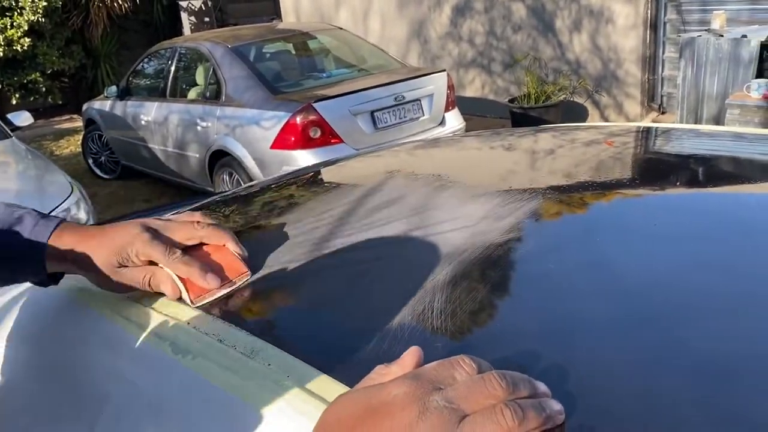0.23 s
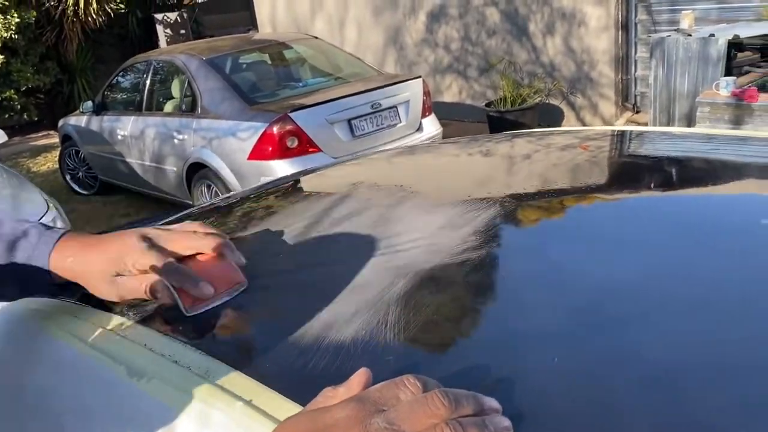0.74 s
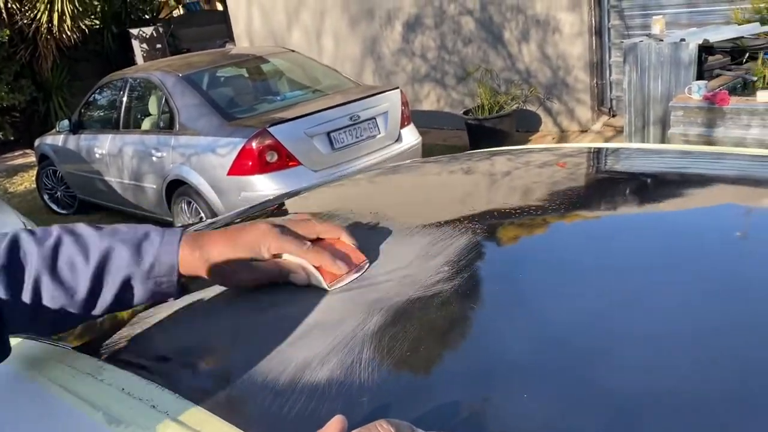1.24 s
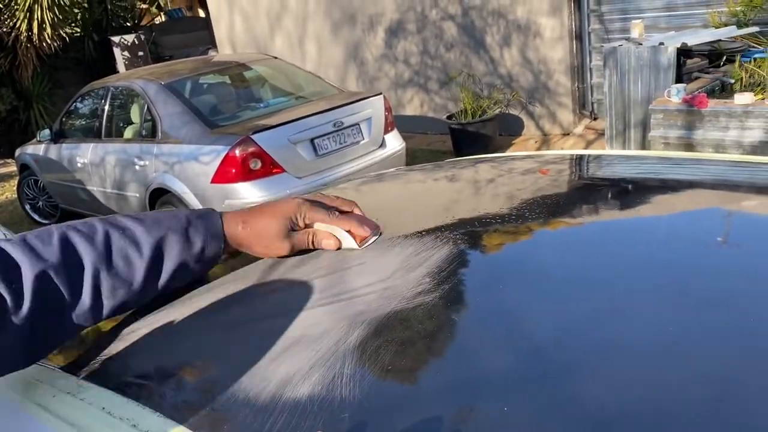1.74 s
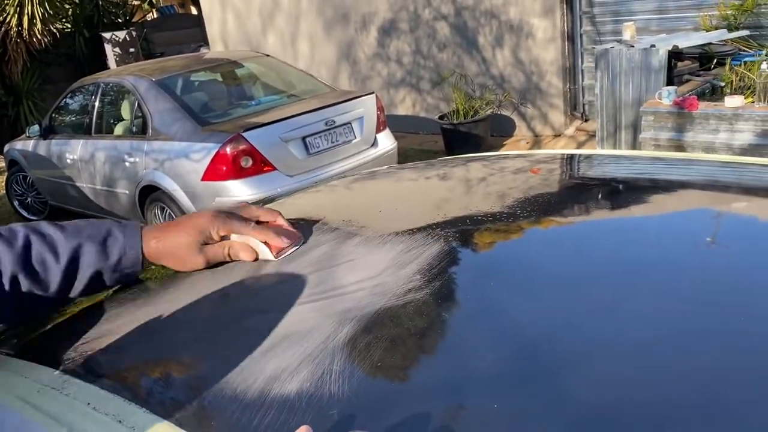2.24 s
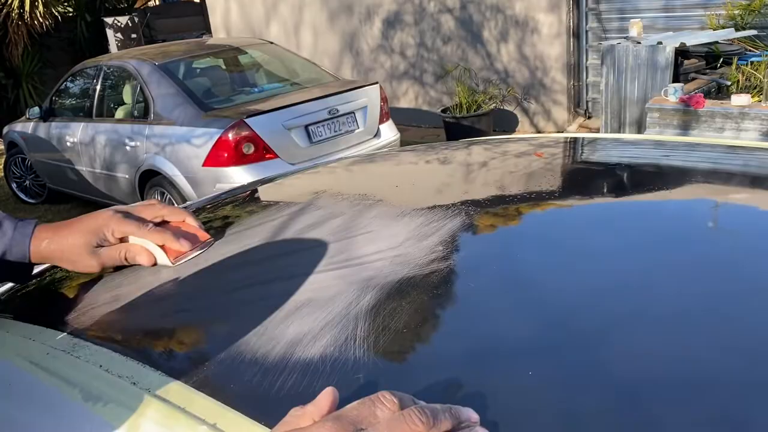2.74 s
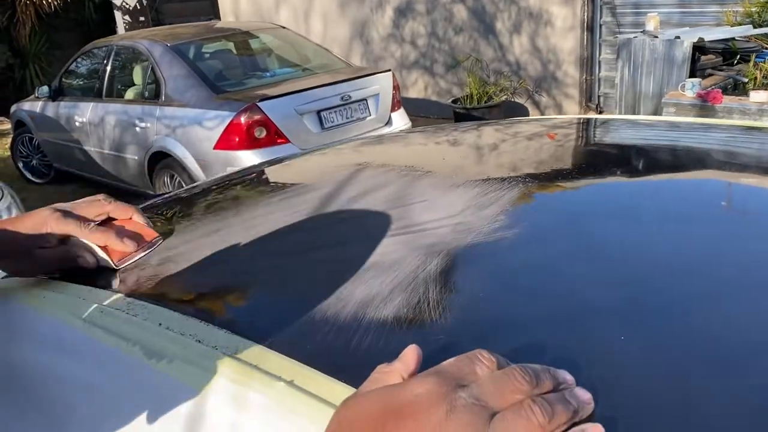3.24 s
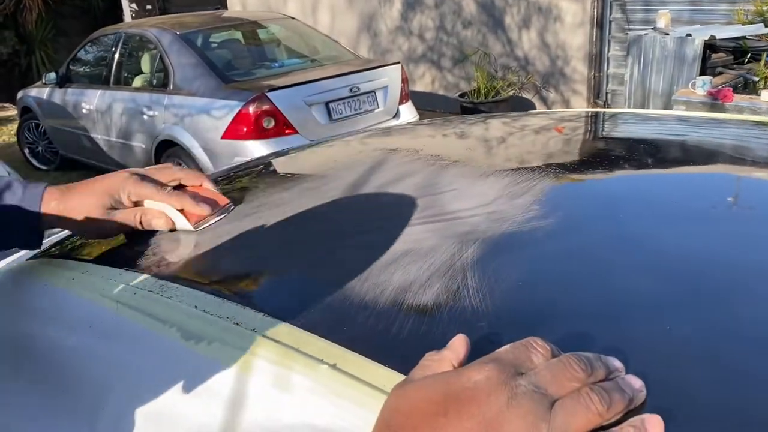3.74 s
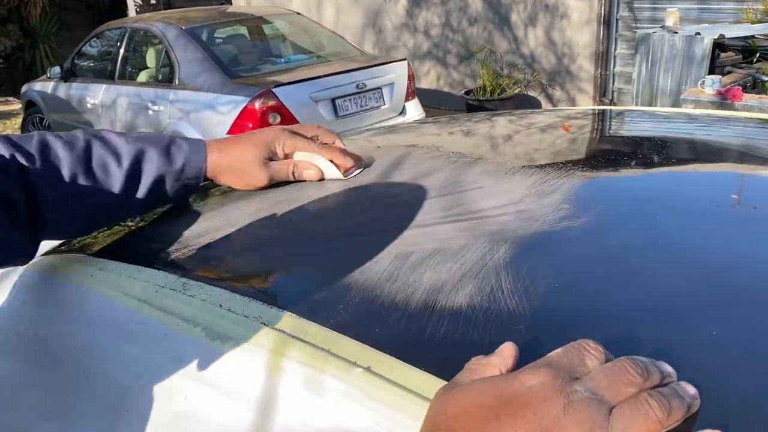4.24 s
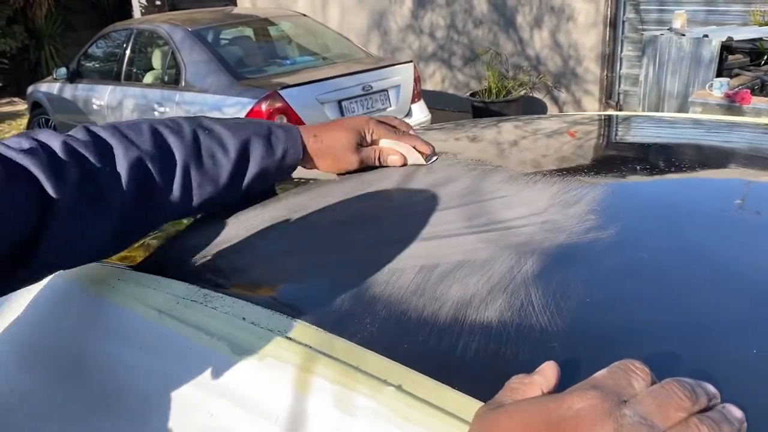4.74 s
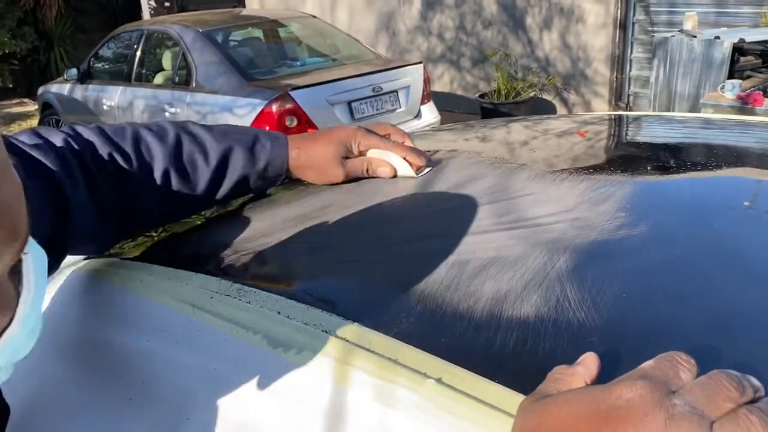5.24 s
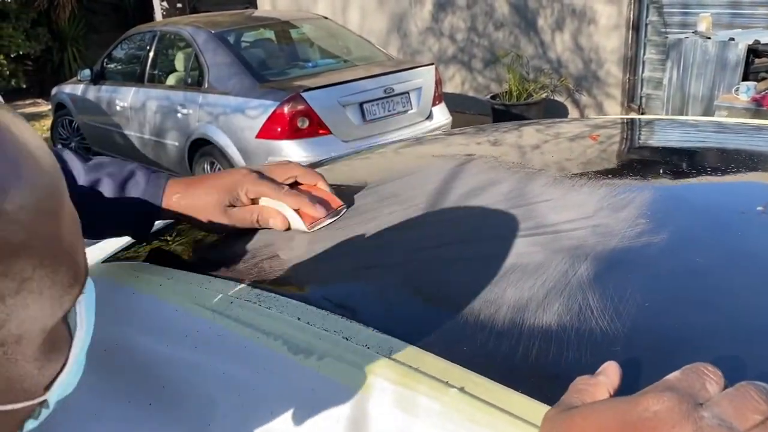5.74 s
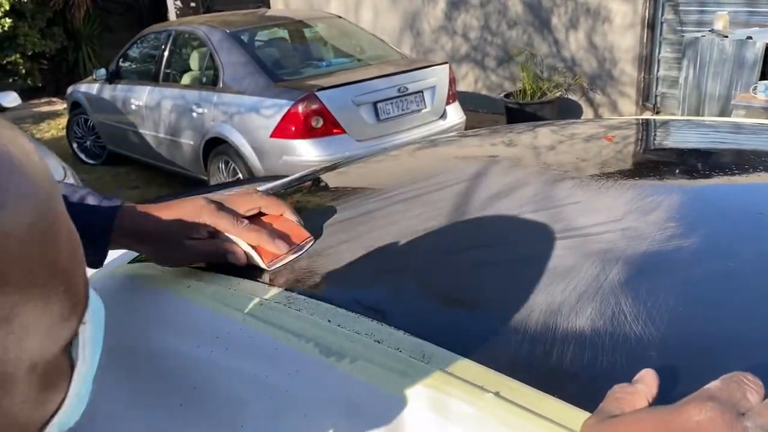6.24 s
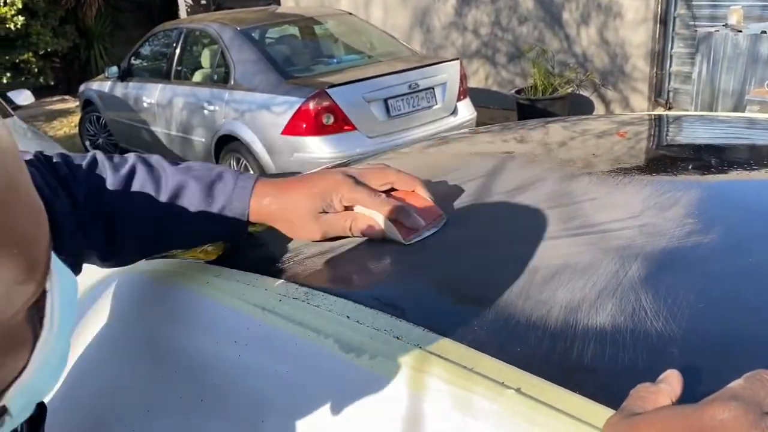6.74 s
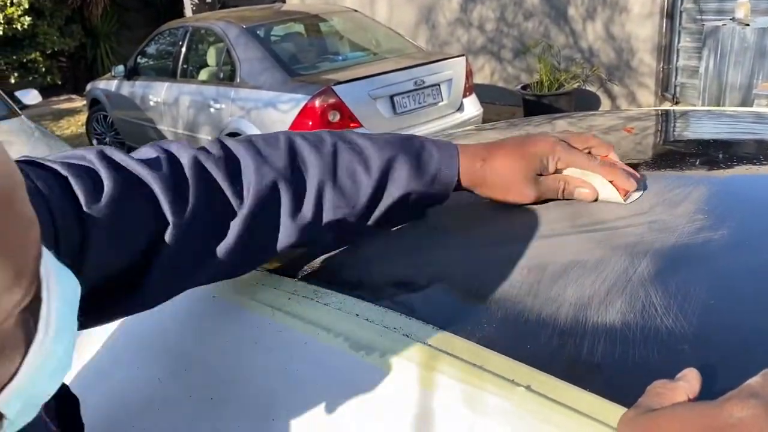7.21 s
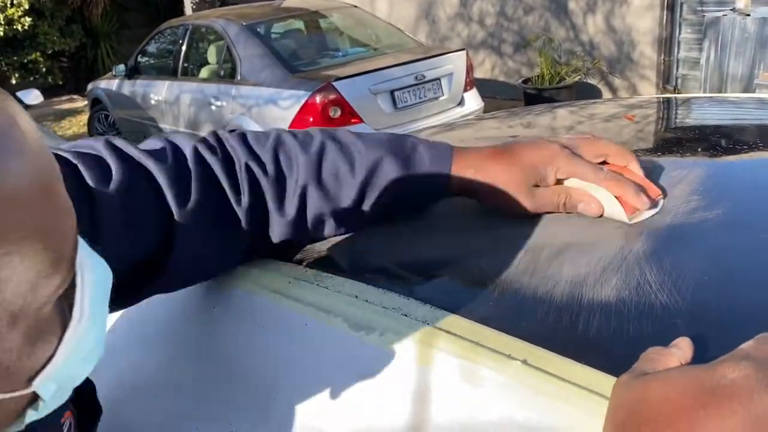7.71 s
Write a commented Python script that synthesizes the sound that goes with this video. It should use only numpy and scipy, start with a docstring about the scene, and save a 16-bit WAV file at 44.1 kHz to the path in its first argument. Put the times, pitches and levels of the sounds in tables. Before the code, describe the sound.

Sandpaper on a hand block rasps rapidly back and forth over a painted car roof, with soft metal thuds and faint outdoor rumble.

```python
"""Quick rasping strokes run throughout: a car roof is sanded by hand in an open yard, about three a second.
Noisy grit follows the speed of the block as rasp, hiss and singing steel, and drops away at every turn.
Now and then the paper judders; filtered blows make the soft thuds of the skin and the knocks on the paint.
A short echo and a low outdoor rumble with gusts and distant traffic lie beneath.
Two closely spaced microphone ports listen from arm's length, differing in phase and level over frequency."""
import sys
import numpy as np
from scipy import signal
from scipy.fft import rfft, irfft, next_fast_len
from scipy.io import wavfile
from scipy.ndimage import uniform_filter1d

SR = 44100
rng = np.random.default_rng(int(sys.argv[2]) if len(sys.argv) > 2 else 0)


def store_wav(level_fs):
    """Save 16-bit WAV to argv[1]."""
    pcm = np.round(np.clip(np.atleast_2d(level_fs), -1, 1) * 32767)
    wavfile.write(sys.argv[1], SR, pcm.T.astype(np.int16))


N = 351477
TIME = np.arange(N) / SR
SIZE = next_fast_len(N, True)   # padded length for the Fourier transforms
HZ = np.maximum(np.arange(SIZE // 2 + 1) * SR / SIZE, 1)


def sanding():
    """Block speed and hand pressure drive rasp, hiss and the ring of the steel, with judders on top."""
    speed, progress = arm(creep=0.039, stick_s=0.0069, stuck_db=-9.5, bite=0.08, bite_s=0.015)
    reach = (1 + np.cos(np.pi * progress)) / 2   # 0 near, 1 far
    rasp_db, hiss_db, panel_db = hand(speed, progress, reach)
    # the paper sticks and slips, and the hand's pressure wavers
    grip = from_db(rasp_db + 0.5 * drift(rate=360) + 0.58 * drift(rate=23))
    ring_gain = from_db(panel_db + 0.83 * drift(rate=37))
    rub = grip * (rasp(speed) + from_db(hiss_db) * hiss(speed) + ring_gain * panel(speed))
    return mottle(rub + judder(speed, reach), broad_db=1.0, fine_db=2.5)


# Each stroke starts at a turn, first at the far end, then near and far in turn:
# (start_s, light_touch_rasp_db, lean_swell_db, lean_place 0 near to 1 far,
#  lean_width as a share of the path, panel_over_rasp_db before reach and leaning)
STROKES = [(-0.123, -45.5, 12.5, 0.54, 0.46, 5), (0.207, -44, 12.7, 0.66, 0.52, 2),
           (0.512, -43, 11, 0.63, 0.38, -0.8), (0.834, -40, 8.5, 0.58, 0.33, -3.5),
           (1.128, -43.5, 10, 0.64, 0.46, -2.1), (1.436, -40.5, 5.5, 0.5, 0.24, -5.5),
           (1.731, -45, 9.5, 0.62, 0.31, -3.5), (2.034, -42.5, 5, 0.61, 0.23, -8.5),
           (2.318, -44, 6, 0.63, 0.17, -8.5), (2.61, -44.5, 7, 0.64, 0.15, -9),
           (2.908, -44.5, 6, 0.66, 0.17, -10.5), (3.218, -43.5, 4, 0.6, 0.1, -8.5),
           (3.511, -44.5, 5.5, 0.6, 0.13, -14), (3.822, -44, 0.8, 0.61, 0.08, -9.5),
           (4.119, -44.5, 3.5, 0.6, 0.08, -13), (4.425, -45, 1, 0.61, 0.08, -10.4),
           (4.72, -45.0, 2.5, 0.64, 0.06, -11), (5.029, -43.5, 2, 0.62, 0.094, -8),
           (5.33, -44.6, 3, 0.65, 0.11, -9), (5.633, -43.5, 6.3, 0.64, 0.21, -1),
           (5.939, -44.5, 6, 0.6, 0.23, -3), (6.25, -42, 8.3, 0.65, 0.33, 2),
           (6.555, -46.5, 10, 0.55, 0.35, 4), (6.86, -43, 10.5, 0.64, 0.41, 4.5),
           (7.165, -47, 11.5, 0.62, 0.45, 5), (7.472, -43, 11.5, 0.69, 0.46, 5.6),
           (7.787, -44.5, 10, 0.61, 0.41, 4.5), (8.07, -44.0, 10.1, 0.6, 0.38, 5.0)]
NEAR_REST_S, FAR_REST_S = 0.012, 0.02   # the block rests at each end of its path


def arm(creep, stick_s, stuck_db, bite, bite_s):
    """The arm swings like a pendulum and rests at each turn: block speed (about 0-1) and strokes completed."""
    start_s = np.array(STROKES)[:, 0]
    count = np.arange(len(start_s))
    rest_s = np.where(count % 2, NEAR_REST_S, FAR_REST_S)
    stops = np.column_stack([start_s - rest_s / 2, start_s + rest_s / 2]).ravel()
    progress = np.interp(TIME, stops, np.repeat(count, 2))
    # the paper holds fast while the hand takes up the slack, then breaks away with a jerk
    latest = np.searchsorted(start_s - rest_s / 2, TIME) - 1
    sliding_s = TIME - (start_s + rest_s / 2 + stick_s)[latest]
    swing = np.abs(np.sin(np.pi * progress)) + creep
    jerk = bite * np.exp(-np.abs(sliding_s) / bite_s)
    speed = np.where(sliding_s > 0, swing + jerk, swing * from_db(stuck_db))
    return uniform_filter1d(speed, size=90), progress


# Fine hiss over the rasp, before the hand's changes: (time_s, level_db)
HISS_LEVEL = [(0, 3.5), (.9, -0.5), (3.3, 2.5), (7.97, 3)]
# towards the far end the rasp grows and the steel rings more freely; leaning damps the ring (dB per dB)
FAR_RASP_DB, FAR_RING_DB, LEAN_DAMPING = 2, 9, 0.99
PULL_HISS_DB, LEAN_HISS = 1.6, 0.27   # extra hiss when pulling back, and per dB of leaning
# a lightly held block keeps hissing when slow: (dB at rest, dB less for each dB of swell)
SLOW_HISS_DB, SLOW_HISS_PER_DB = 6.6, 0.68


def hand(speed, progress, reach):
    """The hand leans in once a stroke: level of the rasp, and of hiss and ring over it, in dB."""
    stroke = progress.astype(int)
    _, touch_db, swell_db, lean_place, lean_width, ring_db = np.array(STROKES)[stroke].T
    place = np.abs(progress % 2 - 1)   # 0 near, 1 far
    pulling = stroke % 2 == 0
    lean_db = swell_db * np.exp(-((place - lean_place) / lean_width) ** 2)
    base_hiss_db = np.interp(TIME, *np.transpose(HISS_LEVEL))
    slow_db = (SLOW_HISS_DB - SLOW_HISS_PER_DB * swell_db) * (1 - speed ** 2)
    rasp_db = touch_db + lean_db + FAR_RASP_DB * reach
    hiss_db = base_hiss_db + PULL_HISS_DB * pulling + LEAN_HISS * lean_db + slow_db
    panel_db = ring_db + FAR_RING_DB * reach ** 2 - LEAN_DAMPING * lean_db
    return rasp_db, hiss_db, panel_db


# Spectrum of the coarse rasp: (frequency_hz, relative_db)
RASP = [(200, -31), (600, -21.5), (1000, -18.5), (1600, -24), (2600, -12), (3400, -5), (4300, -4),
        (4900, -0.6), (5600, -1.1), (6500, -0.5), (7800, -1.5), (9500, -2.5), (16000, -21)]


def rasp(speed):
    """Coarse scraping of the grit, louder as the block moves faster."""
    grains = grit(speed, per_s=2000, size_db=2.0, snag_share=0.11)
    return colour(grains, RASP) * speed ** 0.6


# Spectrum of the fine hiss: (frequency_hz, relative_db)
HISS = [(4000, -41), (6800, -10.5), (8200, -0.5), (9400, 0.5), (11000, 0), (13000, -1), (14800, -3.5),
        (16000, -9)]


def hiss(speed):
    """Fine treble of the grit, which follows speed more closely than the rasp."""
    grains = grit(speed, per_s=4000, size_db=1.5, snag_share=0.14)
    return colour(grains, HISS) * speed ** 0.74


# Spectrum of the singing steel: (frequency_hz, relative_db)
PANEL = [(400, -19.5), (800, -12), (1050, -14.5), (1300, -5.5), (1650, -4), (1950, -0.9), (2300, -2.4),
         (2800, -2), (3500, -4), (4400, -8.5), (6000, -12)]


def panel(speed):
    """The steel skin sings under the grit, drawn as snagging noise in the panel's colour."""
    grains = grit(speed, per_s=700, size_db=2.5, snag_share=0.18)
    return colour(grains, PANEL) * speed ** 0.67


def grit(speed, per_s, size_db, snag_share):
    """Countless grains plough the paint; larger ones snag and snap free. Rows: direct and scattered sound."""
    sizes = from_db(size_db * np.minimum(rng.exponential(1, N), 4))
    struck = rng.random(N) < per_s * (speed + 0.2) / SR
    snags = struck * sizes * rng.standard_normal((2, N))
    share = np.clip(snag_share, 0, 1)
    return np.sqrt(1 - share) * rng.standard_normal((2, N)) + np.sqrt(share) * rms_one(snags)


# The paper judders around the far turns, as a push ends or a pull begins:
# (start_s, level_db before rise and fade, fade_s)
JUDDERS = [(0.526, -33, 0.075), (1.06, -42, 0.05), (1.14, -41, .045), (5.82, -41, 0.093),
           (5.963, -42, 0.16), (6.408, -37, .11), (6.569, -39, 0.16), (7.177, -36, 0.22),
           (7.798, -33.5, 0.18)]


def judder(speed, reach):
    """The paper judders around the far turns; the ring it sets off is lowest with the block at the far end."""
    drive = np.zeros(N)
    for start_s, level_db, fade_s in JUDDERS:
        age = np.maximum(TIME - start_s, 0)
        rise = 1 - np.exp(-age / 0.016)
        drive += from_db(level_db) * rise * np.exp(-(age / fade_s) ** 2)
    centre_hz = 2370 - 400 * reach ** 2
    slips = grit(speed, per_s=1500, size_db=2.5, snag_share=0.35)
    return drive * glide(glide(slips, centre_hz, width_hz=810), centre_hz, width_hz=1000)


# The roof skin flexes: (start_s, source_peak_db, centre_hz)
THUDS = [(.61, -37, 90), (2.028, -37, 75.5), (2.132, -27, 124), (2.15, -24.5, 71), (2.178, -28.5, 81.5),
         (2.388, -27.5, 98), (2.478, -29, 69), (2.62, -33.5, 79), (3.435, -33.5, 75), (5.35, -35, 139),
         (7.122, -31.5, 81), (7.2, -29.5, 90), (7.412, -28, 95), (7.492, -28.5, 83)]
# every judder begins with a jolt that thuds the skin
JOLT_DELAY_S, JOLT_OVER_JUDDER_DB, JOLT_HZ = 0.0099, 3, 113


def thuds():
    """The flexing skin gives soft, broad low blows, on its own and at each judder's jolt."""
    jolts = [(start_s + JOLT_DELAY_S, level_db + JOLT_OVER_JUDDER_DB, JOLT_HZ)
             for start_s, level_db, _ in JUDDERS]
    return blows(THUDS + jolts, octaves=0.82)


# The block knocks on the paint: (start_s, source_peak_db, centre_hz)
KNOCKS = [(.797, -39.5, 1370), (2.83, -48, 453), (3.228, -48, 1000), (4.555, -46, 505), (4.992, -39, 1360)]


def knocks():
    """The block knocks on the paint with brief, narrow rings."""
    return blows(KNOCKS, octaves=0.18)


def blows(rows, octaves):
    """Each blow is an impulse ringing briefly in a band around its own pitch."""
    out = np.zeros(N)
    for start_s, peak_db, centre_hz in rows:
        edges_hz = [centre_hz * 2 ** (-octaves / 2), centre_hz * 2 ** (octaves / 2)]
        band = signal.butter(2, edges_hz, "band", fs=SR, output="sos")
        ring = signal.sosfilt(band, signal.unit_impulse(SR // 10))
        ring *= from_db(peak_db) / np.abs(ring).max()
        at = round(start_s * SR)
        out[at:at + len(ring)] += ring[:N - at]
    return out


def wall_echo(x, level_db, t60):
    """The yard wall and parked cars return a short, thin tail of decaying noise."""
    t = TIME[:SR // 3]
    tail = rng.standard_normal((2, len(t))) * from_db(-60 * t / t60) * (t > 0.008)
    tail /= np.sqrt(np.sum(tail ** 2, axis=1, keepdims=True))
    return from_db(level_db) * signal.fftconvolve(x, tail, axes=1)[:, :N]


# Spectrum of moving air: (frequency_hz, relative_db)
RUMBLE = [(20, -22), (35, -13), (50, -1), (68, 2), (105, -8), (140, -13), (220, -22.5), (500, -55)]
# Gusts: (centre_s, rise_db, half_length_s)
GUSTS = [(2.12, 10.5, .09), (2.462, 11.5, 0.15), (4.05, 6, 0.18), (7.5, 5, 0.8)]
AIR_DB = -50   # rumble of moving air between gusts, before it wavers


def moving_air():
    """Low noise rumbles unsteadily and swells with each gust."""
    gust_db = sum(rise_db * np.exp(-((TIME - centre_s) / half_length_s) ** 2)
                  for centre_s, rise_db, half_length_s in GUSTS)
    level = from_db(AIR_DB + gust_db + 1.8 * drift(rate=14))
    return level * colour(rng.standard_normal((2, N)), RUMBLE)


# Spectrum of distant traffic: (frequency_hz, relative_db)
YARD = [(30, -30), (70, -11.5), (110, -8.5), (140, -3.5), (175, -9.5), (240, -11), (295, -8), (400, -16),
        (600, -19.5), (800, -20.5), (1500, -27), (5000, -30), (16000, -69)]
YARD_DB = -48.5


def distant_traffic():
    """Coloured noise murmurs unevenly as its bands swell and fade."""
    murmur = colour(rng.standard_normal((2, N)), YARD)
    return from_db(YARD_DB) * mottle(murmur, broad_db=0.95, fine_db=1.85)


# Phase between the ports for direct sound: (frequency_hz, left_lead_rad)
PORT_PHASE = [(50, .75), (280, .75), (430, 1.45), (750, 1.55), (1050, .7), (3000, 1.35), (6400, .7),
              (7100, -1), (7900, -1.8), (8350, -3.05), (8650, -3.22), (9100, -4.7), (9850, -6.2),
              (10400, -6.4), (11700, -9.39), (12450, -9.46), (13650, -12.4), (14400, -12.7), (15500, -15.7)]
# Level between the ports: (frequency_hz, left_minus_right_db)
PORT_BALANCE = [(60, 0), (380, -1.3), (700, -2.9), (1400, -2.4), (2380, 1.2), (4400, 3.1), (6000, 3.1),
                (8400, 0), (16000, 0)]


def ports(x, direct_share):
    """Direct sound reaches the two ports with a phase step; scattered sound blurs their difference."""
    direct, scattered = rfft(x, SIZE)
    half = over_hz(PORT_PHASE) / 2
    share = np.clip(direct_share, 0, 1)
    mid = np.cos(half) * direct
    side = np.sin(half) * (1j * np.sqrt(share) * direct + np.sqrt(1 - share) * scattered)
    tilt = from_db(over_hz(PORT_BALANCE) / 2)
    return irfft(np.array([(mid + side) * tilt, (mid - side) / tilt]), SIZE)[:, :N]


def from_db(db):
    """Decibels to gain."""
    return 10 ** (np.asarray(db) / 20)


def rms_one(x):
    """Scale to unit rms."""
    return x / np.sqrt(np.mean(x ** 2) + 1e-20)


def over_hz(points):
    """A table joined by straight lines on a log-frequency axis."""
    hz, value = np.transpose(points)
    return np.interp(np.log(HZ), np.log(hz), value)


def filtered(x, gain):
    """Weight each frequency with a gain."""
    return irfft(rfft(x, SIZE) * gain, SIZE)[..., :N]


def colour(x, spectrum):
    """Give a signal a spectrum; rms 1."""
    return rms_one(filtered(x, from_db(over_hz(spectrum))))


def drift(rate):
    """Smooth chance that changes about rate times a second; spread 1."""
    return rms_one(filtered(rng.standard_normal(N), 1 / (1 + (HZ / rate) ** 2)))


def glide(x, centre_hz, width_hz):
    """A resonance with a moving centre, stepped in short blocks; rms 1."""
    out, state = np.zeros_like(x), np.zeros((2, 2))
    r = np.exp(-np.pi * width_hz / SR)
    size = 128
    for i in range(0, N, size):
        poles = [1, -2 * r * np.cos(2 * np.pi * centre_hz[i] / SR), r * r]
        out[:, i:i + size], state = signal.lfilter([1, 0, -1], poles, x[:, i:i + size], zi=state)
    return rms_one(out)


def mottle(x, broad_db, fine_db):
    """Broad and narrow bands swell and fade at random, so the colour never stands still."""
    frames = signal.stft(x, nperseg=1024)[2]

    def patches(size):
        """Chance smoothed over (bands, frames); spread 1."""
        field = uniform_filter1d(rng.standard_normal(frames.shape[1:]), size=size[0], axis=0)
        return rms_one(uniform_filter1d(field, size=size[1], axis=1))

    gain = from_db(broad_db * patches(size=(22, 5)) + fine_db * patches(size=(3, 6)))
    return signal.istft(frames * rms_one(gain))[1][:, :N]


def scene():
    """Sanding, thuds and knocks over the rumble of the yard, heard at the two ports."""
    work = sanding()
    sound = work + wall_echo(work, level_db=-21.5, t60=0.15) + moving_air() + distant_traffic()
    sound[0] += thuds() + knocks()   # row 0 is the direct sound
    return ports(sound, direct_share=0.25)


CUTOFF_HZ = 15850


def record(dry):
    """The top is cut steeply."""
    return filtered(dry, 1 / np.sqrt(1 + (HZ / CUTOFF_HZ) ** 400))


dry = scene()
out = record(dry)
store_wav(out)
```